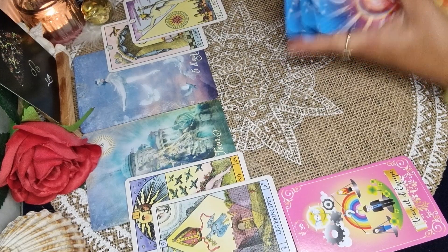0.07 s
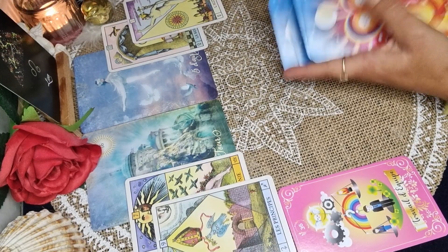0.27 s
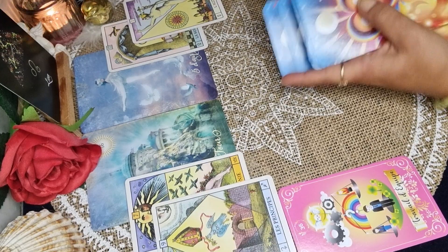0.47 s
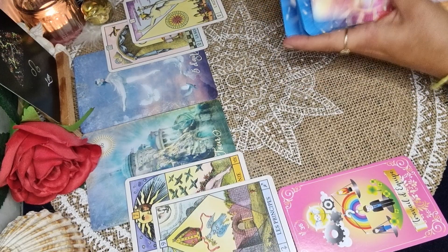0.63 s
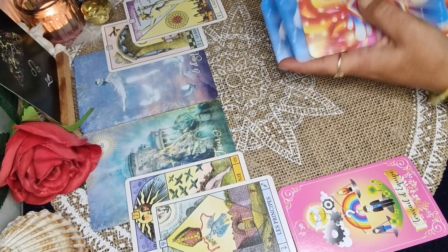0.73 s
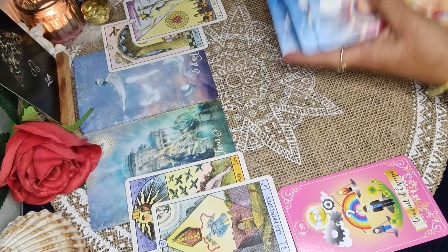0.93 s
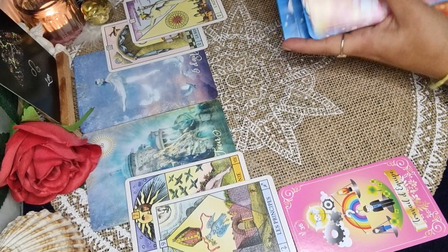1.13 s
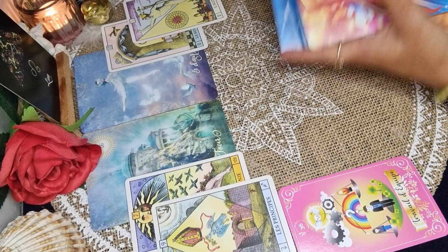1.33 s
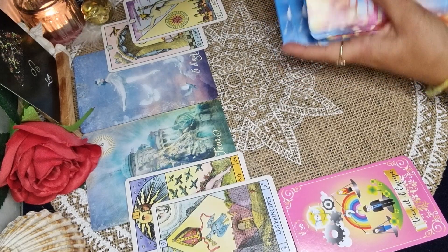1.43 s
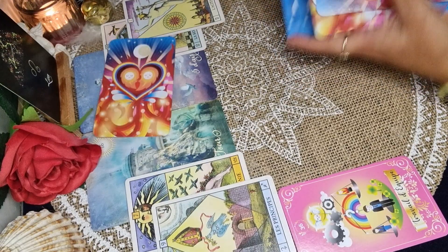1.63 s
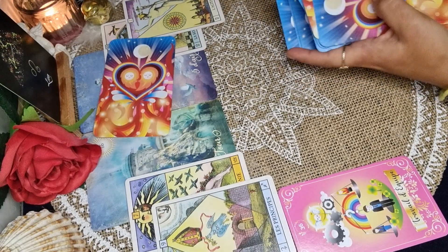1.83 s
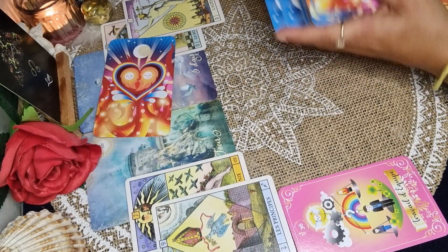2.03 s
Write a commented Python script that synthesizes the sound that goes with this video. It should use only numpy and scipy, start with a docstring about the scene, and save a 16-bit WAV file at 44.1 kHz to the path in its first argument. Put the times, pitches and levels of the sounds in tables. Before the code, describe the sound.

Overhand card shuffling, close and dry, in a small quiet room with faint steady hiss. A firm packet knock opens at 0 s, then short papery slides, crisp edge ticks and soft deck taps follow about four times a second. At 1.62 s a card hits the table with a loud, sharp snap, bounces and flutters flat by 1.67 s, with a brief room tail. Softer strokes continue around 1.85 and 2.0 s.

```python
"""Overhand card shuffle, close up

A phone close over a cloth-covered table in a small quiet room, about four shuffle strokes a second.
Packets of cards slide (dense noise grains), edges tick (brief noise bursts), and packets land on the
deck with a soft knock (short ragged pushes on ringing modes). One card flies out, slaps the table,
bounces and flutters flat. Below lie soft thuds, the low rustle of the hands, a room tail and steady hiss.
"""
import sys
import numpy as np
from scipy import signal
from scipy.fft import rfft, irfft
from scipy.io import wavfile
from scipy.ndimage import uniform_filter1d

SR = 44100
rng = np.random.default_rng(int(sys.argv[2]) if len(sys.argv) > 2 else 0)


def natural_amplitude(level_db):
    """Convert a level in decibels to a linear amplitude factor, elementwise."""
    exponent = np.asarray(level_db, float) / 20
    return 10 ** exponent


def wav_record(signal):
    """Record a signal, one row per channel, as 16-bit PCM in the file named by sys.argv[1]."""
    frames = np.transpose(np.atleast_2d(signal))
    bounded = np.clip(frames, -1, 1)
    # unit amplitude maps onto the largest positive 16-bit level
    quanta = np.round(bounded * 32767).astype(np.int16)
    wavfile.write(sys.argv[1], SR, quanta)


N = 92477  # samples in the scene

# steady room hiss, spectrum: pitch_hz, level_db (relative, per Hz)
HISS_SPECTRUM = [(15, -37), (25, -15), (108, -0.5), (280, 0), (483, 4), (1280, -1), (2820, -5.5),
                 (6550, -5.5), (10400, -9), (15200, -1), (16500, -16)]
# noise added to one channel and subtracted from the other, spectrum: pitch_hz, level_db (relative, per Hz)
SIDE_SPECTRUM = [(25, 2), (300, 2), (1500, -3), (4000, -6), (8000, -2.5), (16000, -3)]
# room tail, strength of each region: pitch_hz, level_db (gain on white noise)
ROOM_LEVELS = [(100, -18.5), (400, -21.5), (1200, -22.5), (2500, -22.5), (5000, -26), (9000, -37.5),
               (15000, -43)]
# room tail, time to fade by 60 dB: pitch_hz, t60_s
ROOM_DECAYS = [(100, 0.38), (1500, 0.25), (5000, 0.51), (15000, 0.14)]
# hand and deck thudding softly: start_s, peak_db, pitch_hz, t60_s
HAND_THUDS = [(.008, -50, 140, 0.035), (0.553, -59, 75, 0.06), (1.315, -61, 185, .1)]
# contacts of the flying card with the table: start_s, level_db (relative), contact_ms
TABLE_SLAPS = [(1.6186, -29.5, 0.62), (1.6209, -8, 0.052), (1.6232, -19, 0.15), (1.629, -24, 0.4),
               (1.6382, -38, 0.16), (1.6485, -33, 0.13), (1.6526, -27, 0.18), (1.665, -31.5, 0.28)]
# modes of a card flat on the table: pitch_hz, level_db (relative), t60_s
TABLE_MODES = [(370, -26.5, 0.034), (875, -16, 0.016), (1240, -16, 0.022), (1385, -21.5, 0.025),
               (1570, -17.5, 0.026), (1750, -15.5, 0.016), (1984, -19, 0.025), (2384, -31, 0.02),
               (4495, -7.5, .013), (5610, -13.5, .012), (6550, -31, 0.0089), (10600, -17, 0.005),
               (12200, -6.5, 0.0026), (15200, -10, .003)]
# packets knocking on the deck: start_s, peak_db, loudest_region_hz
PACKET_KNOCKS = [(0.0074, -24.5, 1300), (0.0101, -21.5, 820), (0.1515, -46, 1000), (0.2315, -42, 2200),
                 (0.236, -42, 1200), (0.2685, -38, 600), (0.276, -36.5, 920), (0.4, -48, 950),
                 (0.5502, -39, 430), (0.5545, -42, 1100), (0.6625, -48, 1200), (0.7065, -48, 2200),
                 (0.746, -45.5, 1400), (0.771, -45, 500), (0.782, -41, 1700), (0.7865, -38, 450),
                 (0.926, -51.5, 540), (0.996, -50, 1780), (1.03, -38, 1910), (1.043, -41, 390),
                 (1.175, -56, 1120), (1.2985, -46, 1260), (1.3035, -46, 600), (1.412, -48, 1450),
                 (1.592, -38.5, 1340), (1.85, -40, 1150), (1.854, -44.5, 334), (1.983, -48, 1040),
                 (2.0198, -44, 700), (2.025, -40, 750)]
# modes of the deck held in the hand: pitch_hz, level_db (relative), t60_s
DECK_MODES = [(200, -8, 0.04), (354, 3, 0.022), (476, 3, 0.022), (694, 3, 0.016), (929, 3, 0.016),
              (1220, -1, 0.018), (1490, -6, 0.014), (1840, -8, 0.011), (2280, -6, 0.01)]
# card edges ticking: start_s, peak_db, centre_hz, fade_ms (time constant)
EDGE_TICKS = [(0.0072, -30, 6420, 1.1), (0.0114, -32, 6540, 1.4), (0.1515, -41, 6200, 1.5),
              (0.2316, -38, 4000, 1.2), (0.2366, -38, 4000, .8), (0.2714, -20, 14000, .8),
              (0.2765, -38, 9000, .8), (0.3421, -47, 14500, 1.5), (0.4015, -49, 6270, 1.4),
              (0.4299, -41, 13000, 1.6), (0.446, -40, 14500, 1.5), (0.5075, -37, 14300, 1.9),
              (0.5399, -27.5, 4560, 2.34), (0.5545, -39, 5450, 1.5), (0.6595, -45, 5970, 1.9),
              (0.7023, -48, 15200, 1.5), (0.7057, -40, 15700, 1.5), (0.7848, -26, 5650, 1.5),
              (0.9145, -50, 15500, 1.5), (1.0327, -35, 5730, 1.4), (1.0989, -41, 14300, 1.5),
              (1.2106, -43, 14900, 2), (1.2987, -35, 4730, 1.2), (1.3842, -48, 5630, 2.1),
              (1.4132, -39, 14700, 1.2), (1.4533, -41, 12200, 1.2), (1.6484, -33, 4330, 2),
              (1.6527, -33, 4500, 1.7), (1.8489, -34, 4600, 2.26), (1.9851, -36, 15200, 1.4)]
# cards sliding on cards: start_s, end_s, start_db, middle_db, end_db, treble_db, body_db
# (the last two are offsets of the treble and the body)
CARD_SLIDES = [(-.02, .012, -46, -40, -53, 0, -1), (0.019, 0.034, -50, -58, -63, 1, 7),
               (0.152, 0.179, -51.5, -56, -56, -1, 8), (0.204, 0.272, -58, -56.5, -38, 1.5, -0.5),
               (.4, 0.437, -52.5, -58, -52.5, -2, 0.5), (0.454, 0.545, -62.5, -51, -49, -2.5, -2),
               (0.557, 0.596, -57, -65, -64, -2, 1), (0.658, 0.697, -61.5, -58, -65, -0.5, -0.5),
               (0.723, 0.788, -55, -52.5, -40, -0.5, 1), (0.928, 0.959, -56.5, -59, -65, 2, 4),
               (.965, 1.042, -59.5, -50.5, -41.5, -2.5, -2.5), (1.105, 1.117, -56, -65, -72, -1.5, -3),
               (1.178, 1.204, -62.5, -60, -59, 2, 4.5), (1.225, 1.305, -63, -59, -51.5, 3.5, 0),
               (1.301, 1.323, -52, -48.5, -56.5, -5, 4), (1.411, 1.423, -52, -60, -53, -2, -1),
               (1.427, 1.456, -51.5, -52.5, -54.5, -3, -4.5), (1.487, 1.594, -66, -52.5, -50.5, 1, 0.5),
               (1.656, 1.675, -51, -46, -58, -6.5, 7), (1.703, 1.737, -52, -55.5, -61, 1.5, 5.5),
               (1.769, 1.855, -60, -51, -50.5, 0.5, -4.5), (1.851, 1.887, -49, -61.5, -60.5, -5.5, -3),
               (1.988, 2.035, -51.5, -52, -59.5, -0.5, 3)]
# spectrum of card on card: pitch_hz, level_db (relative, per Hz)
CARD_SPECTRUM = [(24, -46), (40, -21), (449, -8.5), (624, -6), (933, -6), (1330, -3.5), (3130, -10.5),
                 (3460, -4.5), (7010, 0), (8570, -6), (14900, 0.5), (16500, -11.5)]


def read(table, hz):
    """Value of (Hz, value) points, interpolated on a log frequency axis."""
    points = np.array(table, float)
    return np.interp(np.log(np.maximum(hz, 1)), np.log(points[:, 0]), points[:, 1])


def colour(x, table):
    """Filter x to a (Hz, dB) shape, rms 1."""
    gain = natural_amplitude(read(table, np.fft.rfftfreq(len(x), 1 / SR)))
    y = irfft(rfft(x) * gain, len(x))
    return y / np.sqrt(np.mean(y ** 2))


def band(x, lo_hz, hi_hz):
    """Cut a band with smooth sloping edges."""
    f = np.fft.rfftfreq(len(x), 1 / SR) + 1
    return irfft(rfft(x) / np.sqrt((1 + (lo_hz / f) ** 6) * (1 + (f / hi_hz) ** 6)), len(x))


def add(out, start_s, x):
    """Mix x into out from start_s."""
    i = max(int(round(start_s * SR)), 0)
    out[i:i + len(x)] += x[:len(out) - i]


def drift(shape, span):
    """Slow random wander, deviation about 1: white noise averaged over span samples."""
    return np.sqrt(span) * uniform_filter1d(rng.standard_normal(shape), size=span)


def ring(modes, gains, push):
    """Decaying modes (pitch_hz, level_db, t60_s) driven by a short force; levels come from gains."""
    t = np.arange(int(.12 * SR)) / SR
    pitch_hz, t60_s = modes[:, :1], modes[:, 2:]
    fade = np.exp(-np.log(1000) * t / t60_s)
    response = (gains[:, None] * fade * np.cos(2 * np.pi * pitch_hz * t)).sum(0)
    return signal.fftconvolve(response, push)[:len(t)]


def room_hiss():
    """Steady noise of the quiet room, shaped once and never changing in level."""
    level_db = -70  # rms
    return natural_amplitude(level_db) * colour(rng.standard_normal(N), HISS_SPECTRUM)


def side_noise(mid):
    """Faint noise, heard with opposite sign in the two channels, its level partly following the middle."""
    level_db, follow_share = -44, .6  # share of level changes, in dB, that the noise follows
    follow = np.sqrt(uniform_filter1d(mid ** 2, size=256) + 1e-12)
    return natural_amplitude(level_db) * follow ** follow_share * colour(rng.standard_normal(N), SIDE_SPECTRUM)


def room(x):
    """Diffuse tail: half-octave bands of noise, each fading at its own rate."""
    first_echo_s = 0.0037  # silent until then, full at twice that time
    t = np.arange(int(.6 * SR)) / SR
    noise, tail = rng.standard_normal(len(t)), 0
    onset = np.clip(t / first_echo_s - 1, 0, 1)
    for hz in 60 * 2 ** np.arange(0, 8.2, .5):
        env = np.exp(-np.log(1000) * t / read(ROOM_DECAYS, hz)) * onset
        env /= np.sqrt(np.sum(env ** 2))
        tail = tail + natural_amplitude(read(ROOM_LEVELS, hz)) * band(noise, hz / 1.19, hz * 1.19) * env
    return signal.fftconvolve(x, tail)[:N]


def rumble(cards):
    """Low rustle of the moving hands: bass noise that swells with the smoothed level of the cards."""
    level_db, top_hz = -21, 170  # level against the cards
    noise = band(rng.standard_normal(N), 60, top_hz)
    swell = uniform_filter1d(np.abs(cards), size=1500)
    return natural_amplitude(level_db) * swell * noise / noise.std()


def thuds():
    """Soft low bumps, each a decaying sine at one pitch with a rounded start."""
    rise_s = 0.0086
    out, t = np.zeros(N), np.arange(8192) / SR
    for start_s, peak_db, pitch_hz, t60_s in HAND_THUDS:
        env = (1 - np.exp(-t / rise_s)) * np.exp(-np.log(1000) * t / t60_s)
        y = np.sin(2 * np.pi * pitch_hz * t) * env
        add(out, start_s, natural_amplitude(peak_db) * y / np.abs(y).max())
    return out


def rattle():
    """The card flutters flat: scattered papery taps that fade from the loudest slap on."""
    level_db, fade_s, centre_hz, spread_db = -47, .035, 1100, 3  # level before the fade
    out, t = np.zeros(N), np.arange(8192) / SR
    taps = (rng.random(len(t)) < .015) * rng.standard_normal(len(t))
    taps *= natural_amplitude(spread_db * rng.exponential(size=len(t)))
    b, a = signal.butter(2, [centre_hz / 2, centre_hz * 2], "band", fs=SR)
    y = signal.lfilter(b, a, taps)
    loudest_s = max(TABLE_SLAPS, key=lambda row: row[1])[0]
    add(out, loudest_s, natural_amplitude(level_db) * np.exp(-t / fade_s) * y / y.std())
    return out


def slaps():
    """Hard flat contacts: crack plus modes of card and table; the room hears the low modes and the crack."""
    crack_db, splash_db, splash_ms = -4.5, -20.5, 1
    detune, scatter_db = .06, 4  # all contacts but the loudest lie differently
    low_hz, ring_heard_far_hz, far_crack_db = 217, 2600, 8
    near, far, table = np.zeros(N), np.zeros(N), np.array(TABLE_MODES)
    loudest_db = np.array(TABLE_SLAPS)[:, 1].max()
    splash_fade = np.exp(-np.arange(256) / SR * 1e3 / splash_ms)
    for start_s, level_db, contact_ms in TABLE_SLAPS:
        scatter, shift = rng.standard_normal((2, len(table))) * (level_db < loudest_db)
        modes = np.c_[table[:, 0] * (1 + detune * shift), table[:, 1:]]
        gains = natural_amplitude(table[:, 1] + scatter_db * scatter)
        # force: one smooth hump as long as the contact, with unit area
        u = (np.arange(128) + .5) / SR * 1e3 / contact_ms
        push = np.where(u < 1, np.sin(np.pi * np.minimum(u, 1)) ** 2, 0) + 1e-9
        push /= push.sum()
        splash = np.diff(rng.standard_normal(256), prepend=0) * splash_fade
        crack = natural_amplitude(splash_db) * np.convolve(splash, push)
        crack[:128] += natural_amplitude(crack_db) * push
        add(near, start_s, natural_amplitude(level_db) * ring(modes, gains, push))
        add(near, start_s, natural_amplitude(level_db) * crack)
        low_gains = gains * (table[:, 0] < ring_heard_far_hz)
        add(far, start_s, natural_amplitude(level_db) * ring(modes, low_gains, push))
        add(far, start_s, natural_amplitude(level_db + far_crack_db) * crack)
    b, a = signal.butter(2, low_hz, "high", fs=SR)
    return signal.lfilter(b, a, near), signal.lfilter(b, a, far)


def knocks():
    """A short ragged flex of the packet rings the deck, whose modes shift with the grip, over a papery scuff."""
    push_cycles, ragged = 1.5, 3  # push length in cycles of the loudest region; noise against sine
    octaves, scatter_db, floor_db = 0.65, 3, -24  # how widely the modes are excited
    detune, scuff_db = .07, -6
    out, deck, t = np.zeros(N), np.array(DECK_MODES), np.arange(512) / SR
    for start_s, peak_db, hz in PACKET_KNOCKS:
        noise = rng.standard_normal(512)
        scatter, shift = rng.standard_normal((2, len(deck)))
        excited = np.exp(-(np.log2(deck[:, 0] / hz) / octaves) ** 2) + natural_amplitude(floor_db)
        u = t * hz / push_cycles
        push = (np.sin(2 * np.pi * hz * t) + ragged * noise) * u * np.exp(-2 * u)
        modes = np.c_[deck[:, 0] * (1 + detune * shift), deck[:, 1:]]
        y = ring(modes, excited * natural_amplitude(deck[:, 1] + scatter_db * scatter), push)
        b, a = signal.butter(1, [hz / 2, hz * 2], "band", fs=SR)
        scuff = signal.lfilter(b, a, push)
        y = y / np.abs(y).max()
        y[:512] += natural_amplitude(scuff_db) * scuff / np.abs(scuff).max()
        add(out, start_s, natural_amplitude(peak_db) * y / np.abs(y).max())
    return out


def ticks():
    """Each edge gives a brief noise burst, broad with one loud region and duller above it."""
    octaves, broad_db, rise_ms = 0.57, -6, 0.45
    out, t = np.zeros(N), np.arange(1024) / SR
    f = np.fft.rfftfreq(1024, 1 / SR) + 1
    for start_s, peak_db, hz, fade_ms in EDGE_TICKS:
        loud_region = np.exp(-(np.log2(f / hz) / octaves) ** 2)
        broad = natural_amplitude(broad_db) * natural_amplitude(read(CARD_SPECTRUM, f)) / (1 + (f / hz / 2) ** 4)
        burst = irfft(rfft(rng.standard_normal(1024)) * (loud_region + broad), 1024)
        y = burst * (1 - np.exp(-1e3 * t / rise_ms)) * np.exp(-1e3 * t / fade_ms)
        add(out, start_s, natural_amplitude(peak_db) * y / np.abs(y).max())
    return out


def slides():
    """Dense grit of sliding faces; pressure runs start-middle-end, with quick grip and short release."""
    attack_s, release_s, soft_start_s_per_db = 0.003, .0065, .0007  # a steeper swell starts softer
    grain_per_s, grain_spread_db = 14000, 1
    flutter_db, patchy_db = 1.52, 2.5  # level wander of the whole, and of each region by itself
    body_top_hz, treble_from_hz = 2600, 6900
    t = np.arange(N) / SR
    grit = (rng.random(N) < grain_per_s / SR) * rng.standard_normal(N)
    grit *= natural_amplitude(grain_spread_db * rng.exponential(size=N))
    grit = colour(grit, CARD_SPECTRUM) * natural_amplitude(flutter_db * drift(N, 150))
    body, treble = band(grit, 20, body_top_hz), band(grit, treble_from_hz, SR)
    middle = grit - body - treble
    body, middle, treble = natural_amplitude(patchy_db * drift((3, N), 400)) * np.array([body, middle, treble])
    out = np.zeros(N)
    for start_s, end_s, start_db, middle_db, end_db, treble_db, body_db in CARD_SLIDES:
        times = [start_s, (start_s + end_s) / 2, end_s]
        pressure = natural_amplitude(np.interp(t, times, [start_db, middle_db, end_db]))
        grip_s = attack_s + soft_start_s_per_db * max(middle_db - start_db, 0)
        grip = np.clip((t - start_s) / grip_s, 0, 1)
        release = np.exp(-np.maximum(t - end_s, 0) / release_s)
        out += pressure * grip * release * (middle + natural_amplitude(treble_db) * treble + natural_amplitude(body_db) * body)
    return out


def scene():
    """Cards and hands close by, room tail and hiss in the middle; a faint noise of opposite sign per channel."""
    near, far = slaps()
    cards = slides() + ticks() + knocks() + rattle()
    hands = cards + thuds() + rumble(cards)
    mid = hands + near + room(hands + far) + room_hiss()
    side = side_noise(mid)
    return np.array([mid + side, mid - side])


def low_pass(x):
    """Removes everything above the highest recorded frequency."""
    return signal.sosfilt(signal.butter(12, 17150, fs=SR, output="sos"), x)


def record(dry):
    """The phone microphone's sound loses its top and its lowest bass."""
    top_hz, low_hz = 15880, 30
    x = signal.sosfilt(signal.ellip(8, .2, 60, top_hz, fs=SR, output="sos"), dry)
    x = signal.sosfilt(signal.butter(2, low_hz, "high", fs=SR, output="sos"), x)
    return low_pass(x)


dry = scene()
out = record(dry)
wav_record(out)
```